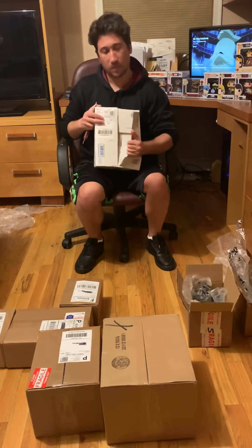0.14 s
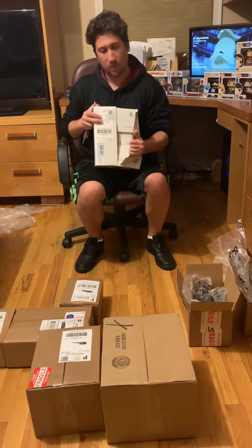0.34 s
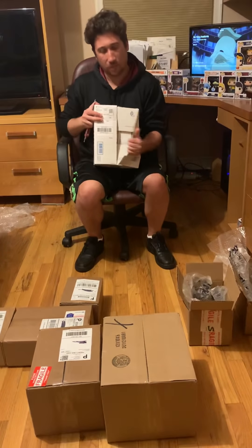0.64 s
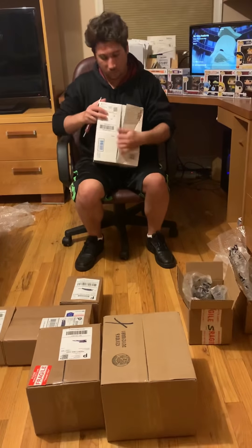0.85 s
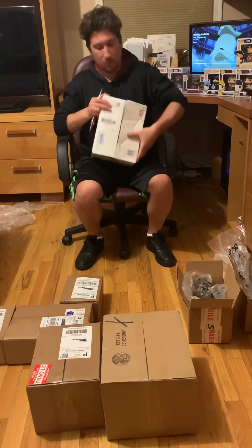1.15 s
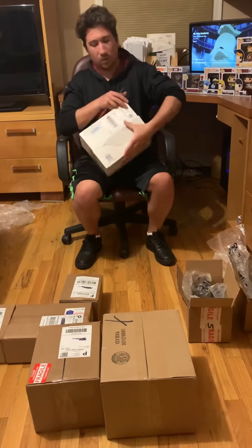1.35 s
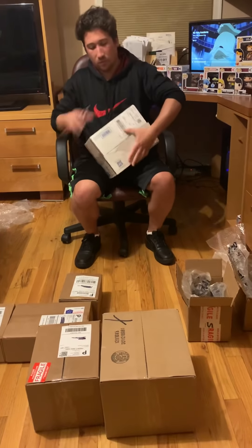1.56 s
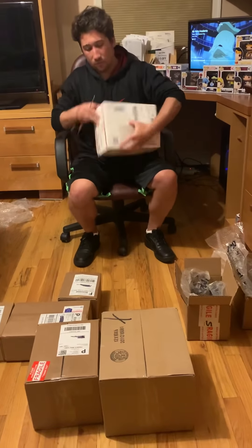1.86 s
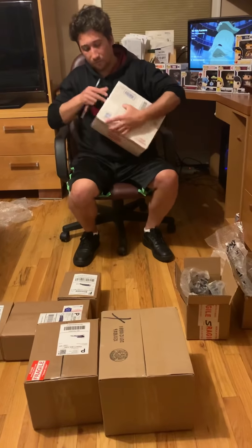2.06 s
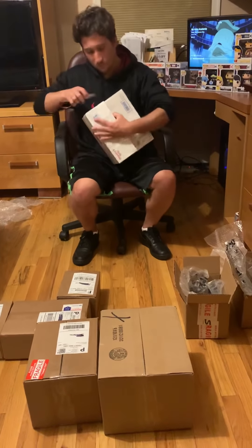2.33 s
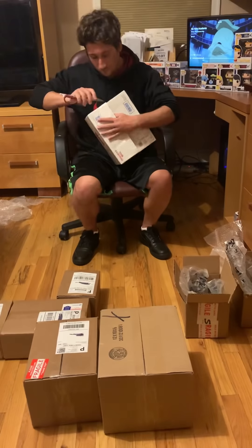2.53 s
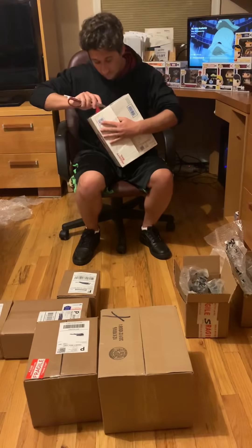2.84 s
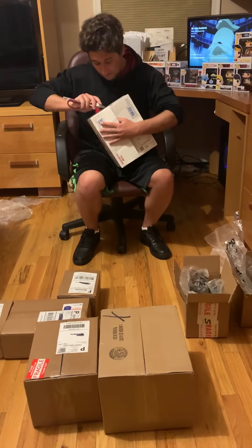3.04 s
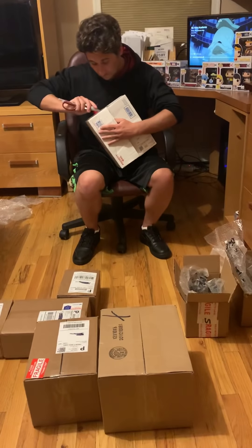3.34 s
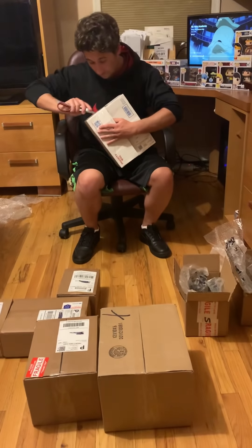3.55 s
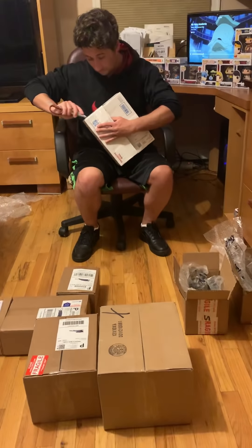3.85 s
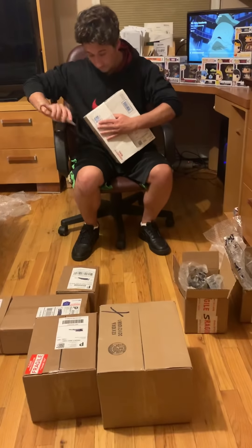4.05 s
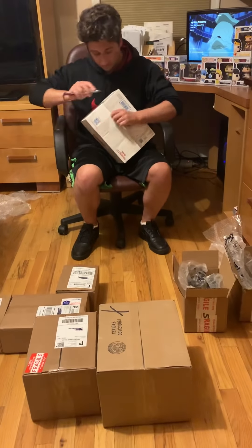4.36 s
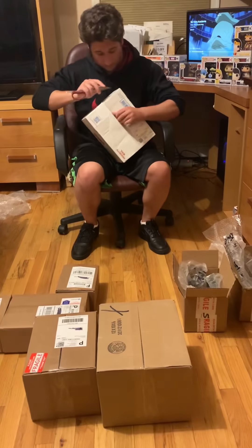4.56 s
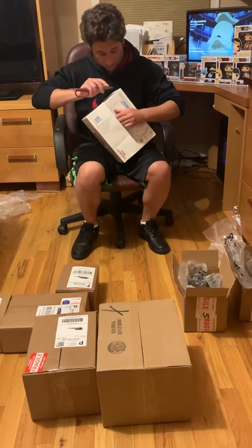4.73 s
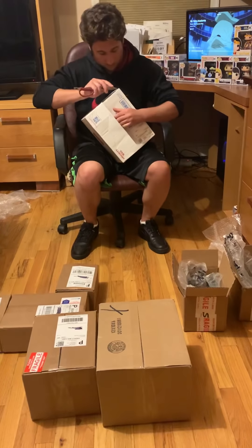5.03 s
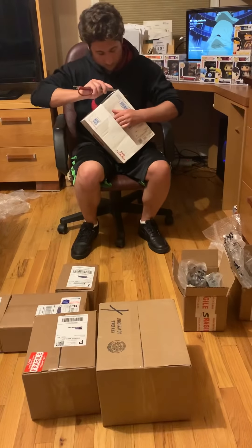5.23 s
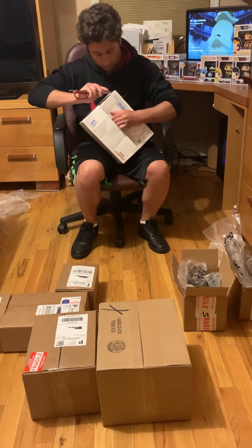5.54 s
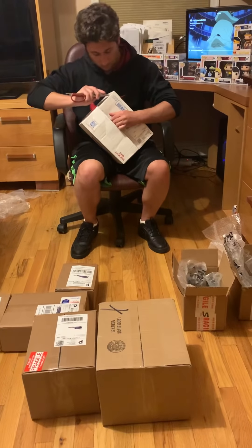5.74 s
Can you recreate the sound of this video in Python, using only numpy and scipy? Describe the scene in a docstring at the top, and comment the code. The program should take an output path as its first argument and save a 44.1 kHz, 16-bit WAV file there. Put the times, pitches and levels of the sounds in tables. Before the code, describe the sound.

A cardboard box is turned with papery scrapes and hollow thumps, then its tape is cut in short, snapping jerks.

```python
"""Opening a taped cardboard box

Someone holds a box on the lap, a few steps away in a small, quiet room with a wooden floor.
Scissors knock on it, then hands slide over it, bump it and bend its walls as it is turned.
A blade saws through the packing tape in jerks: it sticks and slips, tape and cardboard snap,
and the hollow box booms."""
import sys
import numpy as np
from scipy import signal
from scipy.fft import rfft, irfft
from scipy.io import wavfile
from scipy.ndimage import uniform_filter1d

SR = 44100
rng = np.random.default_rng(int(sys.argv[2]) if len(sys.argv) > 2 else 0)


def int16_out(signal):
    """Quantize to a 16-bit WAV file."""
    q = np.round(np.clip(np.atleast_2d(signal).T, -1, 1) * 32767)
    wavfile.write(sys.argv[1], SR, q.astype(np.int16))


N = 259731
HIT = SR // 3   # samples in one short hit
HIT_S = np.arange(HIT) / SR


def from_db(db):
    """Turn decibels into a number to multiply by."""
    return 10 ** (np.asarray(db) / 20)

def rms_one(x):
    """Scale a long sound to an average power of 1."""
    return x / np.sqrt(np.mean(x ** 2) + 1e-20)

def energy_one(x):
    """Scale a short sound to a total energy of 1."""
    return x / np.sqrt(np.sum(x ** 2) + 1e-20)

def steady(x, size=3000):
    """Even out slow changes in loudness but keep the fine grain."""
    return x / np.sqrt(np.abs(uniform_filter1d(x ** 2, size)) + 1e-12)

def at_hz(points, hz):
    """Read between the rows of a table, giving every octave equal room."""
    known, values = np.transpose(points)
    return np.interp(np.log(np.maximum(hz, 1)), np.log(known), values)

def add(track, s, sound):
    """Mix a sound into the track, starting at s seconds."""
    at = max(round(s * SR), 0)
    track[at:at + len(sound)] += sound[:N - at]

def through(x, response):
    """Give every sample of a sound the same echo or ring."""
    return signal.fftconvolve(x, response)[:len(x)]

def cut_bass(x, hz, order=2):
    """Weaken everything below hz."""
    return signal.sosfilt(signal.butter(order, hz, "high", fs=SR, output="sos"), x)

def colour(x, tone, size=4096):
    """Make some frequencies louder and others softer, following rows of (Hz, dB)."""
    gains = from_db(at_hz(tone, np.arange(size // 2 + 1) * SR / size))
    cepstrum = irfft(np.log(gains))
    # folding it in half makes the filter ring only after a hit, never before
    cepstrum[1:size // 2] *= 2
    cepstrum[size // 2 + 1:] = 0
    return through(x, irfft(np.exp(rfft(cepstrum))))

def drift(per_s, count=3000):
    """A random curve that wanders around zero, mostly within 1 of it."""
    return np.interp(np.arange(N) * per_s / SR, np.arange(count), rng.standard_normal(count))

def ringing(modes, scatter_db, detune=0.0):
    """A struck object rings with fading tones (modes); strength and pitch can vary by chance."""
    hz, db, fade_s = np.transpose(modes)[:, :, None]
    strength, shift = rng.standard_normal((2, *hz.shape))
    sign = (-1) ** np.arange(len(hz))[:, None]
    waves = np.sin(2 * np.pi * hz * np.exp(detune * shift) * HIT_S)
    levels = from_db(db + scatter_db * strength - 60 * HIT_S / fade_s)
    return energy_one(np.sum(sign * levels * waves, axis=0))

def burst(fade_s, rise_s):
    """Many tiny cracks blur into a puff of noise that builds up and dies."""
    envelope = (1 - np.exp(-HIT_S / rise_s)) ** 2 * from_db(-60 * HIT_S / fade_s)
    return energy_one(rng.standard_normal(HIT) * envelope)

def slips(per_s, spread_db, clump_db, clumps_per_s):
    """Rubbing surfaces stick and slip, making uneven clicks that come in clumps."""
    sizes = from_db(spread_db * np.minimum(rng.exponential(1, N), 4) + clump_db * drift(clumps_per_s))
    signs = rng.choice([-1, 1], N)
    slipped = rng.random(N) < per_s / SR
    return steady(sizes * signs * slipped)

def squeaky(x, ring, low_hz, high_hz, count):
    """As the touching point moves, faint squeaks come and go in the rubbing."""
    width_hz, ring_db, swing_db, per_s = ring
    pitches = np.geomspace(low_hz, high_hz, count) * np.exp(.02 * rng.standard_normal(count))
    out = x
    for k, hz in enumerate(pitches):
        squeak = signal.lfilter(*signal.iirpeak(hz, hz / width_hz, fs=SR), x)
        out = out + (-1) ** k * squeak * from_db(ring_db + swing_db * drift(per_s))
    return steady(out)

def stroke_envelope(starts, lengths, levels_db, shape):
    """Loudness of hand strokes: each swells, sags as the arm runs out of reach, and dies."""
    swell_share, sag_db_per_s, release_db_per_s = shape
    power = np.zeros(N)
    t = np.arange(SR) / SR
    for s, length, db in zip(starts, lengths, levels_db):
        swell = np.sin(np.pi / 2 * np.minimum(t / (swell_share * length), 1))
        fall_db = sag_db_per_s * t + release_db_per_s * np.maximum(t - length, 0)
        add(power, s, (swell * from_db(db - fall_db)) ** 2)
    return np.sqrt(power)


# How alike the room sounds left and right. Each row: frequency in Hz, likeness from 0 to 1.
LIKENESS = [(150, 0.86), (300, 0.71), (600, 0.29), (1100, 0.15), (2200, 0.14), (5000, 0.091)]
def stereo_noise(size):
    """Noise from all around reaches two close microphones alike in the bass, unlike in the treble."""
    shared, opposite = rfft(rng.standard_normal((2, size)))
    alike = at_hz(LIKENESS, np.arange(len(shared)) * SR / size)
    return irfft(np.sqrt(1 + alike) * shared + np.sqrt(1 - alike) * opposite * [[1], [-1]], size)

# The tone of the still room. Each row: frequency in Hz, relative level in dB.
HUSH_TONE = [(60, -3), (400, -12.5), (1500, -22.5), (3500, -34), (7000, -41.5), (14000, -39)]
def room_hush(level_db=-64):
    """A faint, low noise fills the room."""
    return from_db(level_db) * rms_one(np.array([colour(ear, HUSH_TONE) for ear in stereo_noise(N)]))

# How long the room rings. Each row: frequency in Hz, seconds to fade by 60 dB.
ROOM_FADE = [(150, 0.29), (1000, 0.26), (5000, 0.31), (14000, 0.22)]
def echo_tail(build_s=0.0015, absorb_hz=300):
    """Countless echoes blur and fade, each octave at its own pace; furniture and walls soak up bass."""
    size = SR // 2
    t, hz = np.arange(size) / SR, np.arange(size // 2 + 1) * SR / size
    spectrum, tail = rfft(stereo_noise(size)), 0
    octave = np.round(np.log2(np.clip(hz, 64, 16000)))
    for k in np.unique(octave):
        band = irfft(spectrum * (octave == k), size)
        tail = tail + band * from_db(-60 * t / at_hz(ROOM_FADE, 2 ** k))
    tail = np.sqrt(2) * energy_one(tail * (1 - np.exp(-t / build_s)))
    return cut_bass(tail, absorb_hz, order=1)

# Echoes off desk, floor and cabinet.
# Each row: left delay in seconds, right delay in seconds, level in dB against the direct sound.
FIRST_ECHOES = [(.0025, .00316, -5.5), (.0072, 0.0041, -21), (0.0093, 0.0091, -12.5)]
def room(x, direct_db=-2, tail_db=-1, left_lag_s=0.00008):
    """The sound arrives directly, then as a few echoes, then as a tail that shifts as box and arms move."""
    early = np.zeros((2, HIT))
    for left, right, db in FIRST_ECHOES:
        early[[0, 1], [round(left * SR), round(right * SR)]] += from_db(db)
    early = cut_bass(early, hz=600)   # bass bends round small surfaces instead of coming back
    early[[0, 1], [round(left_lag_s * SR), 0]] += 1   # the direct sound
    out = from_db(direct_db) * np.array([through(x, ear) for ear in early])
    blend = np.array([drift(per_s=7) for _ in range(4)])   # wander between four tails
    for share in blend / np.linalg.norm(blend, axis=0):
        out += from_db(tail_db) * np.array([through(x * share, ear) for ear in echo_tail()])
    return out

# The tone of the hollow box. Each row: frequency in Hz, relative level in dB.
BOOM_TONE = [(25, -10.5), (90, -3.5), (170, -2), (300, -2), (420, -2), (600, -11.5), (1200, -35)]
def box_boom(friction):
    """The hollow box turns small clicks into a low boom."""
    return colour(friction, BOOM_TONE)

# The box bends. Each row: start in seconds, length in seconds, relative level in dB.
FLEXES = [(0.656, 0.25, -43), (1.065, 0.036, -41.5), (1.464, 0.087, -45.5), (1.901, 0.028, -39),
          (2.062, 0.06, -39), (2.128, 0.073, -45.5), (2.404, 0.043, -50.5), (2.536, 0.15, -47.5),
          (4.609, 0.09, -49.5)]
# One bend: share of its length spent swelling, then sag and release in dB per second.
FLEX_SHAPE = (0.15, 86, 350)
def wall_flexes(boom_db=-3):
    """The walls give under the grip with a dull rumble."""
    s, length, db = np.transpose(FLEXES)
    creep = slips(per_s=1100, spread_db=2, clump_db=8, clumps_per_s=37)
    return stroke_envelope(s, length, db + boom_db, FLEX_SHAPE) * rms_one(box_boom(creep))

# The tone of rubbed cardboard. Each row: frequency in Hz, relative level in dB.
RUB_TONE = [(250, -4.5), (450, -1.5), (780, -3.5), (1020, 1.5), (1600, -6), (2600, -11), (6000, -22.5)]
# Its squeaks: width in Hz, level in dB against the plain rub, swing in dB, changes per second.
BOARD_SQUEAKS = (72, -16.5, 5, 21.5)
def board_rub(friction):
    """Rubbed cardboard makes a soft, papery scrape."""
    return squeaky(colour(friction, RUB_TONE), BOARD_SQUEAKS, low_hz=550, high_hz=2600, count=13)

# The tone of rubbed tape. Each row: frequency in Hz, relative level in dB.
RASP_TONE = [(900, -4.5), (2400, 2), (4400, 0), (6000, 0.5), (7300, -4), (9000, -1.5), (14000, -0.5)]
# Its squeaks: width in Hz, level in dB against the plain rasp, swing in dB, changes per second.
TAPE_SQUEAKS = (174, -21, 6, 18)
def tape_rasp(friction):
    """Tightly stretched tape makes a bright rasp when rubbed."""
    return squeaky(colour(friction, RASP_TONE), TAPE_SQUEAKS, low_hz=2400, high_hz=14000, count=20)

# A hand slides. Each row: start in seconds, length in seconds, rub in dB, rasp in dB above the rub.
SLIDES = [(0, 0.029, -26, -11), (0.111, 0.26, -47, -1.5), (0.36, 0.18, -57.5, 5), (0.433, 0.14, -48.5, -5),
          (0.616, 0.18, -49, -19), (0.719, 0.13, -43, -18), (0.942, 0.2, -55.5, 4.5),
          (1.239, 0.15, -57, 5.5), (1.395, 0.15, -58, -3), (1.577, 0.056, -53.5, -0.5),
          (1.646, 0.097, -48, -5.5), (1.797, 0.32, -56, 2), (2.221, 0.33, -58.5, 1.5),
          (2.485, 0.16, -59, 1), (3.166, 0.075, -68, 1)]
# One slide: share of its length spent swelling, then sag and release in dB per second.
SLIDE_SHAPE = (0.47, 18, 280)
def hand_slides(boom_db=-7):
    """Hands slide smoothly over cardboard and tape; the box booms a little with them."""
    s, length, db, rasp = np.transpose(SLIDES)
    friction = slips(per_s=6700, spread_db=2, clump_db=3.5, clumps_per_s=82)
    body = board_rub(friction) + from_db(boom_db) * rms_one(box_boom(friction))
    return (stroke_envelope(s, length, db, SLIDE_SHAPE) * body
            + stroke_envelope(s, length, db + rasp, SLIDE_SHAPE) * tape_rasp(friction))

# The tones of the box walls. Each row: pitch in Hz, relative level in dB, seconds to fade by 60 dB.
WALL_MODES = [(70, -17, 0.24), (136, -12, 0.2), (185, -7.5, 0.071), (291, -4, 0.079), (407, -4.5, 0.04),
              (783, 3, 0.022), (1014, 1.5, 0.055), (1159, 0, 0.014), (1470, 6, 0.008), (2350, -11.5, 0.016)]
# Bumps on the box. Each row: start in seconds, then relative level, clap and crack, all in dB.
BUMPS = [(0.459, -28, -2, -0.5), (1.179, -16, -7, -17.5), (1.747, -25, -20, -17),
         (1.861, -36.5, -14.5, -18), (2.056, -19.5, -5.5, -37), (2.534, -43, -12, 0.5), (2.834, -61, 3, -7),
         (4.264, -45, -10.5, -5.5), (4.369, -45.5, -1.5, -7), (4.975, -50.5, -25, -24.5),
         (5.193, -43, -13, -16.5)]
def hand_bumps(gain_db=21, clap_db=3, crack_db=-1, thud_hz=380, clap_hz=850, brush_s=0.0034):
    """A hand brushes the box, then lands: a soft palm wakes low tones, a firm slap high ones too."""
    out = np.zeros(N)
    for s, db, clap, crack in BUMPS:
        walls = ringing(WALL_MODES, scatter_db=-0.7, detune=0.022)
        walls = energy_one(colour(walls, [(thud_hz, 0), (clap_hz, clap + clap_db)]))
        scuff = energy_one(colour(burst(fade_s=0.02, rise_s=0.0072), RUB_TONE))
        contact = energy_one(colour(burst(fade_s=0.25, rise_s=0.00014), RASP_TONE))
        add(out, s - brush_s, from_db(db + gain_db + clap) * scuff)
        add(out, s, from_db(db + gain_db) * (walls + from_db(crack + crack_db) * contact))
    return out

# The tone of a snap. Each row: frequency in Hz, relative level in dB.
SNAP_TONE = [(250, -12), (1100, 2.5), (2200, -2.5), (4400, -1), (7200, -8), (14000, -9)]
# Tape and cardboard snap, and light taps land on the box (the dull rows). Each row: time in seconds, relative
# level in dB, relative treble in dB.
SNAPS = [(0.132, -22.5, 2.5), (0.323, -28.5, -33), (0.458, -25, 2), (0.647, -38.5, -15),
         (0.723, -22.5, -1.5), (0.745, -22, -15), (0.806, -23.5, 12), (0.842, -30, -12), (0.924, -19.5, -2),
         (1.595, -44, -10), (1.697, -24, -33), (1.815, -23, 6.5), (2.548, -31.5, -25), (2.964, -42, 38),
         (3.229, -40, -10), (3.333, -32.5, 7), (3.358, -23.5, 2.5), (3.682, -25, -7), (3.986, -23, -1),
         (4.307, -25.5, -15.5), (5.431, -40, -6), (5.469, -41, 21.5), (5.535, -37.5, 0.5),
         (5.811, -22, -13)]
def snaps(gain_db=13, treble_db=7, middle_hz=2500, treble_hz=9000, strain_s=0.001195):
    """Tape and cardboard strain for an instant and give way in short bright crackles; the dull ones are light
    taps on the box."""
    out = np.zeros(N)
    for s, db, treble in SNAPS:
        crackle = colour(burst(fade_s=0.037, rise_s=0.00052), SNAP_TONE)
        crackle = energy_one(colour(crackle, [(middle_hz, 0), (treble_hz, treble + treble_db)]))
        add(out, s - strain_s, from_db(db + gain_db) * crackle)
    return out

# The tones of the knock. Each row: pitch in Hz, relative level in dB, seconds to fade by 60 dB.
KNOCK_MODES = [(174.4, -16.5, 0.034), (419.6, -12.5, 0.062), (550, -2.5, 0.05), (930, -3.5, 0.022),
               (1083, -1, 0.018), (1246, -3, 0.028), (1430, 3.5, 0.012), (1625, 1, 0.011),
               (2730, -3, 0.0092), (4340, 2.5, 0.0064), (6180, -3, 0.0066)]
# A light touch, the knock and a bounce. Each row: start in seconds, relative level in dB.
KNOCKS = [(0.001, -14.5), (0.0204, -7.5), (0.027, -22.5)]
def scissor_knock(gain_db=21, crack_db=-4):
    """Steel hits the box with a crack and a short, stiff ring."""
    out = np.zeros(N)
    for s, db in KNOCKS:
        crack = energy_one(colour(burst(fade_s=0.0061, rise_s=0.0009), SNAP_TONE))
        ring = ringing(KNOCK_MODES, scatter_db=2.5, detune=0.021)
        add(out, s, from_db(db + gain_db) * (ring + from_db(crack_db) * crack))
    return cut_bass(out, hz=90)   # the knock carries no deep bass

# The tones of the taped end. Each row: pitch in Hz, relative level in dB, seconds to fade by 60 dB.
SEAM_MODES = [(141.5, 8, 0.14), (196, -8.5, 0.22), (288.8, 6.5, 0.12), (402, -5.5, 0.11), (580, 3.5, 0.034),
              (987, -3, 0.04), (1316, -11, 0.036)]
# The blade jerks forward and catches. Each row: start in seconds, relative level in dB.
JERKS = [(3.37, -31), (3.552, -30), (3.586, -28.5), (3.633, -30), (3.69, -20), (3.717, -33.5),
         (3.795, -30.5), (3.864, -30), (3.964, -33), (3.987, -22.5), (4.018, -18.5), (5.433, -28.5),
         (5.624, -27.5), (5.713, -28), (5.814, -26), (5.842, -21.5), (5.865, -22.5)]
def blade_jerks(gain_db=20, tug_s=0.0011, free_s=.045, grip_db_per_s=500):
    """Each catch tugs the taped end of the box: it thumps and rings until the grip stills it."""
    out = np.zeros(N)
    tug = 1 - np.exp(-HIT_S / tug_s)
    grip = from_db(-grip_db_per_s * np.maximum(HIT_S - free_s, 0))
    for s, db in JERKS:
        ring = ringing(SEAM_MODES, scatter_db=2.5, detune=0.032)
        add(out, s, from_db(db + gain_db) * energy_one(tug * grip * ring))
    return out

# One push of the blade: how fast it builds, sags and lets go, each in dB per second.
PUSH_SHAPE = (750, 21.5, 490)
def push_envelope(starts, lengths, levels_db, lead_s=.05):
    """Loudness of pushes: force builds until the blade bites, sags as it travels, then lets go."""
    build_db_per_s, sag_db_per_s, release_db_per_s = PUSH_SHAPE
    power = np.zeros(N)
    t = np.arange(SR) / SR - lead_s
    for s, length, db in zip(starts, lengths, levels_db):
        fall_db = np.maximum(-build_db_per_s * t, sag_db_per_s * t)
        fall_db += release_db_per_s * np.maximum(t - length, 0)
        add(power, s - lead_s, from_db(db - fall_db) ** 2)
    return np.sqrt(power)

# The blade cuts. Each row: bite time in seconds, length in seconds, rub in dB, rasp in dB above the rub.
CUTS = [(3.34, 0.049, -56.5, 6), (3.542, 0.023, -49, -2), (3.586, 0.032, -48, 0), (3.684, 0.019, -47, 4.5),
        (3.742, 0.011, -47.5, 2), (3.783, 0.0094, -47.5, 3.5), (3.84, 0.018, -48.5, 0.5),
        (3.962, 0.016, -44, 0.5), (3.986, 0.018, -38.5, -19), (4.22, 0.25, -61, -16),
        (4.556, 0.051, -51, -1.5), (4.587, 0.087, -52.5, -21), (4.7, 0.077, -64, -37),
        (5.356, 0.11, -61, -20), (5.586, 0.025, -50.5, -2.5), (5.659, 0.029, -49.5, -3),
        (5.812, 0.09, -41.5, -10)]
def blade_cuts(boom_db=-3, seam_db=-8):
    """The blade's coarse bite rubs the cardboard, rasps the tape and makes the box boom and ring."""
    s, length, db, rasp = np.transpose(CUTS)
    sawing = slips(per_s=650, spread_db=4, clump_db=4, clumps_per_s=160)
    seam = from_db(seam_db) * steady(through(sawing, ringing(SEAM_MODES, scatter_db=-1)))
    boom = from_db(boom_db) * steady(box_boom(sawing))
    body = push_envelope(s, length, db) * (board_rub(sawing) + boom + seam)
    return body + push_envelope(s, length, db + rasp) * tape_rasp(sawing)


def scene():
    """The box is handled and cut in a quiet room."""
    box = scissor_knock() + hand_bumps() + blade_jerks() + snaps()
    box = box + hand_slides() + wall_flexes() + blade_cuts()
    return room_hush() + room(box)

def record(dry, notch_hz=11400, notch_db=-24, top_hz=14600, top_db=-14, cutoff_hz=15950):
    """The microphone loses a narrow band of treble and fades at the very top; loud peaks are clipped."""
    tone = [(notch_hz - 850, 0), (notch_hz - 280, notch_db), (notch_hz + 280, notch_db),
            (notch_hz + 850, 0), (top_hz, 0), (cutoff_hz, top_db)]
    heard = np.clip([colour(ear, tone) for ear in dry], -1, 1)
    return signal.sosfilt(signal.cheby2(14, 70, cutoff_hz, fs=SR, output="sos"), heard)


dry = scene()
out = record(dry)
int16_out(out)
```